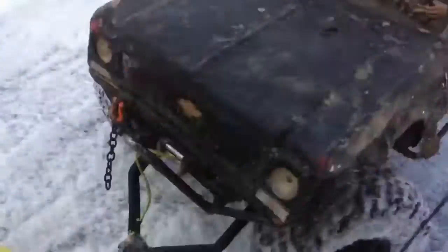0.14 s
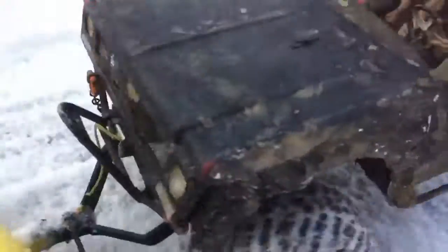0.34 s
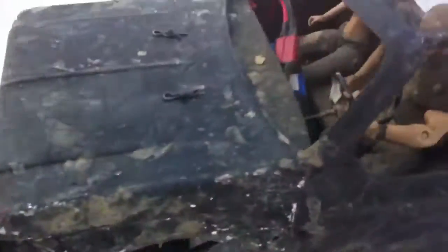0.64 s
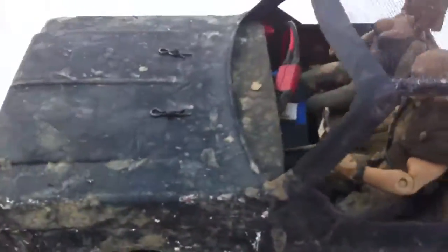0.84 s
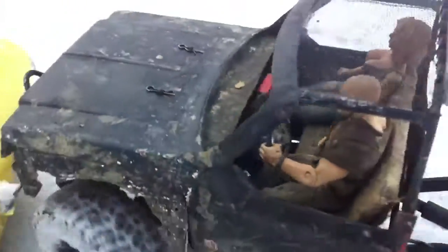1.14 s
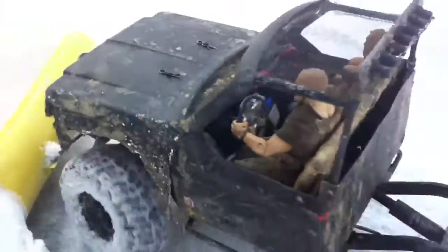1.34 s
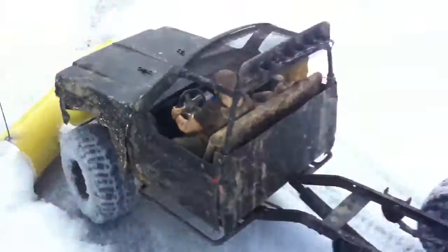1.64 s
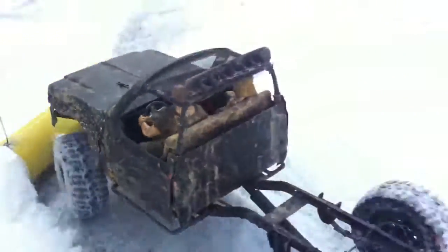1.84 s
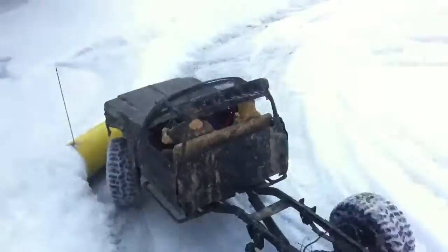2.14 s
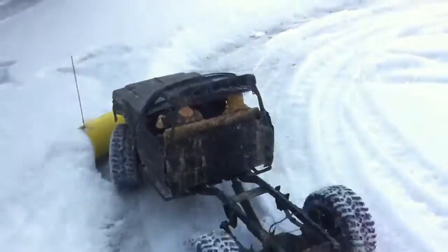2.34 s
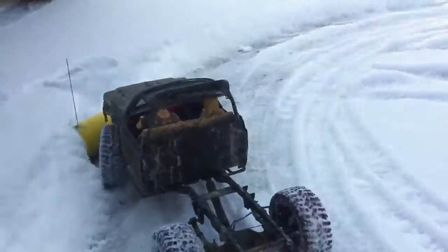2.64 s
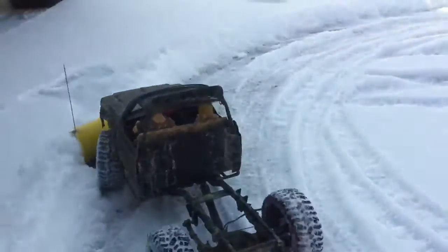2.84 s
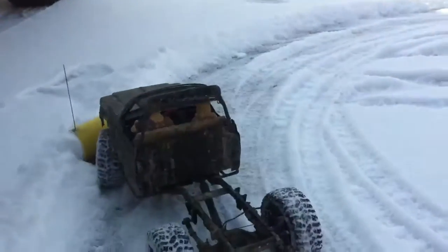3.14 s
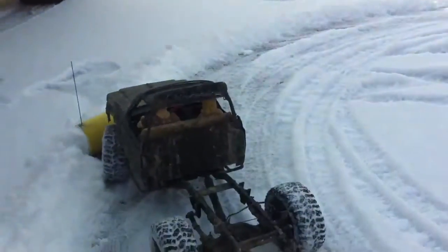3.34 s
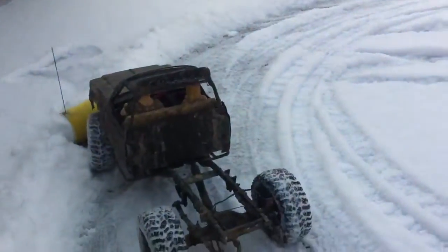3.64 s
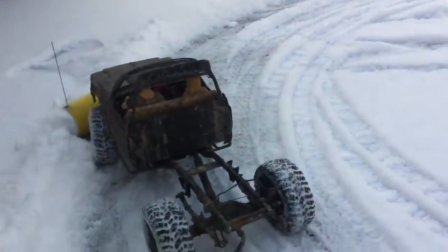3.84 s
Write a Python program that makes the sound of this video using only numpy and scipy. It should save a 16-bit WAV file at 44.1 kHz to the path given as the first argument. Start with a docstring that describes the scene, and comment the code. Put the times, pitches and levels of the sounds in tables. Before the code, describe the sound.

Close gear chatter and motor whir from a toy truck, cutting out once.

```python
"""A toy truck ploughs through snow close by, its loaded gear teeth chattering and shaking the chassis.
It passes side-on, then shows its ringing rear gearbox; slack gears clack and the body thuds over bumps.
As the load eases the motor's pulsing whir takes over. It stalls for a moment, leaving metal parts
ringing over a faint bed of outdoor air, and spins up again."""
import sys
import numpy as np
from scipy import signal
from scipy.fft import rfft, irfft, next_fast_len
from scipy.io import wavfile
from scipy.ndimage import uniform_filter1d, map_coordinates

SR = 44100
rng = np.random.default_rng(int(sys.argv[2]) if len(sys.argv) > 2 else 0)


def dump_mix(stems):
    """Bounce the given channels to the path in sys.argv[1] as a 16-bit WAV at rate SR."""
    frames = np.atleast_2d(stems).T  # one column per channel
    limited = np.clip(frames, -1, 1)  # hard clip at full scale
    pcm = np.round(limited * 32767).astype(np.int16)
    wavfile.write(sys.argv[1], SR, pcm)


N = 176400

# drive train fader, surging as the tyres grip and slip (time [s], level [dB])
DRIVE_LEVEL = [(0.0, -30.5), (0.33, -30.5), (0.36, -27), (0.39, -29), (0.5, -30), (0.53, -26.5),
               (0.57, -32), (0.61, -24.5), (0.62, -28.5), (0.69, -25.5), (0.71, -31), (0.76, -24),
               (0.79, -30), (0.84, -24), (0.88, -32), (0.94, -27), (1.08, -24.5), (1.1, -29), (1.14, -22),
               (1.2, -28.5), (1.25, -23), (1.37, -26.5), (1.4, -22), (1.42, -30.5), (1.44, -26.5),
               (1.48, -22), (1.52, -31.5), (1.56, -23), (1.61, -31), (1.64, -25.5), (1.74, -29.5),
               (1.79, -27.5), (1.84, -32.5), (1.87, -27), (1.91, -31), (1.95, -26), (1.98, -32),
               (2.05, -26), (2.09, -35.5), (2.15, -29.5), (2.2, -34), (2.22, -27.5), (2.31, -31.5),
               (2.35, -28.5), (2.46, -32), (2.47, -29), (2.52, -33), (2.6, -33), (2.62, -28.5), (2.66, -29),
               (2.7, -35.5), (2.77, -32.5), (2.84, -39.5), (2.9, -25), (3.04, -35), (3.17, -32),
               (3.3, -38.5), (3.33, -39.5), (3.36, -45.5), (3.38, -60), (3.41, -69), (3.5, -77.5),
               (3.515, -62), (3.56, -47.5), (3.6, -41), (3.63, -35), (3.83, -30.5), (4, -36.5)]
# motor speed (time [s], speed [turns/s])
MOTOR_SPEED = [(0, 135), (.35, 148), (.6, 147), (1.2, 168), (1.56, 178), (1.75, 168), (2.2, 170),
               (2.6, 150), (2.95, 160), (3.04, 158), (3.1, 103), (3.16, 147), (3.21, 143), (3.29, 123),
               (3.35, 119), (3.39, 40), (3.5, 38), (3.58, 80), (3.68, 111), (3.77, 128), (3.87, 130),
               (4, 124)]
# mix under the drive fader (time [s], chassis [dB], chatter [dB], gear case [dB], open side [dB],
# cab [dB], rear gearbox [dB], whir [dB], whine [dB])
PART_MIX = [(0, -7, -3, -14, -7.5, -34, -1.5, -7.5, -27), (.5, -8.5, -2.5, -10, -24, -30, -20, -11.5, -34),
            (.8, -12, -3, -5, -10, -13, -11, -7.5, -13), (1.08, -13, -4, -44, -2, -10.5, -32, -10, -36),
            (1.25, -16.5, -5, -18.5, -4, -8.5, -14, -14, -23),
            (1.62, -12.5, -8, -13.5, -6.5, -8.5, -17, -7.5, -7),
            (1.85, -10, -5, -9.5, -36, -8.5, -4.5, -5.5, -10),
            (2.65, -13.5, -7.5, -8.5, -41, -29, -3.5, -5, -17),
            (2.95, -18, -12.5, -6.5, -4, -22, -4, -3.5, -18), (3.1, -23, -16, -13, -28, -27, -3, -7, -22),
            (3.17, -33, -14, -15.5, -19, -13, -8, -0.5, -5),
            (3.33, -17.5, -6, -9.5, -35, -5.5, -0.5, 2.5, -12), (3.41, -2, -6, -8, -17, -31, -23, -39, -7),
            (3.5, -4, -3, -14, -22, -26, -18, 3, -18), (3.53, -18, -4.5, -13, -10, -13, -8, -17, -22),
            (3.66, -24, -21, -10, -30, -20, -4.5, -1.5, -27),
            (3.76, -35, -20.5, -31, -22, -16, -22, -3.5, -28),
            (4, -28.5, -18, -22, -19, -27, -13, -1.5, -35)]
# tone colours of the noise layers (frequency [Hz], gain [dB])
CHATTER_EQ = [(410, -60), (700, -11), (818, -7.5), (907, -13), (1130, -3), (1240, -4.5), (1830, -0.5),
              (2220, -4.5), (2990, -0.5), (4240, -5.5), (4580, -9.5), (5710, -6.5), (6850, -11),
              (13100, -18.5), (15500, -36)]
WHIR_EQ = [(120, -84), (200, -70), (283, -31), (327, -46), (544, -28), (992, -17), (1280, -27), (1510, -12),
           (1950, -8.5), (2090, -15), (2750, -1), (3420, 1.5), (4500, -6), (5200, 2), (5900, -1.5),
           (6800, 1.5), (10500, -7.5), (15500, -16)]
CHASSIS_EQ = [(40, -31), (90, -26), (140, -9.5), (205, 1), (300, 0), (400, 4.5), (490, 10), (590, 3.5),
              (720, 0), (1000, 1.5), (2000, -7.5)]
THUD_EQ = [(70, -45), (185, -1), (260, 0), (350, -10), (480, 10), (700, -7), (1200, -2), (2200, -13)]
AIR_EQ = [(25, -10), (100, 4), (220, 6.5), (400, -3), (1200, -11), (3000, -15), (15000, -42)]
CLACK_EQ = [(100, -55), (500, -22), (1800, -15), (2850, -12), (3300, 3), (3900, -14), (15000, -34)]
# resonances of the housings (frequency [Hz], width [Hz], gain [dB])
GEAR_CASE_MODES = [(868, 43, 0.5), (1830, 147, 5.5)]
OPEN_SIDE_MODES = [(2350, 350, -0.89), (2800, 500, 0.93)]
CAB_MODES = [(4040, 170, 4.5), (4330, 67, 4), (9950, 430, -4.5)]
REAR_GEARBOX_MODES = [(2010, 35, -25), (3253, 290, 10.5), (6400, 130, -9), (8100, 360, -2)]
# tones of the meshing gears (pitch [x motor speed], level against the whir [dB], flutter [x pitch])
MESH_TONES = [(2.19, -38, 0.0088), (10, -25, 0.0165)]
# whine of the loaded teeth (pitch [x motor speed], relative level [dB], width [Hz])
WHINE_TONES = [(19.75, 14, 190), (31.3, -17, 250)]
# ringing metal parts (frequency [Hz], relative level [dB], t60 [s])
METAL_MODES = [(623, -6.5, 0.45), (898, -5.5, 0.8), (1390, -4, .26), (1916, -5, 0.23), (2073, 2, 0.16),
               (2428, 5, 0.18), (2724, 0, 0.36), (3830, -9, 0.21), (8629, -15, 0.96)]
# bumps of the chassis (time [s], level [dB])
CHASSIS_BUMPS = [(.826, -31.5), (1.134, -40), (1.63, -29.5), (2.019, -25), (2.039, -36), (2.226, -35)]
# slack gears taking up the load (time [s], level [dB])
GEAR_CLACKS = [(0.754, -22), (.897, -26), (1.434, -26), (1.634, -18), (1.748, -21), (1.846, -24),
               (2.093, -26.5), (2.12, -28), (2.345, -25.5), (2.723, -29.5), (3.512, -60), (3.558, -45)]

LOADED_ABOVE_DB = -16.5  # chatter level from which the motor runs unevenly
LEVELLER_SAMPLES = 2600  # window that irons out slow swings in level


def amp(db):
    """Decibels to gain."""
    return 10 ** (np.asarray(db) / 20)


def unit(x):
    """x at rms 1."""
    return x / np.sqrt(np.mean(x ** 2) + 1e-20)


def curves(rows):
    """One automation curve for each column after the time."""
    times, *columns = np.transpose(rows)
    return [np.interp(np.arange(N) / SR, times, column) for column in columns]


def wobble(rate):
    """A smooth random curve, rate knots a second."""
    knots = rng.standard_normal(4096)[:int(N * rate / SR) + 4]
    return map_coordinates(knots, [np.arange(N) * rate / SR])


def filtered(x, response):
    """x times a complex response of frequency."""
    size = 2 * next_fast_len(N * 3 // 4)
    return irfft(rfft(x, size) * response(np.fft.rfftfreq(size, 1 / SR)), size)[:N]


def coloured(x, eq):
    """x through a minimum-phase EQ of (frequency [Hz], gain [dB]) points."""
    points_hz, db = np.transpose(eq)

    def response(hz):
        gain = amp(np.interp(np.log(hz + 1), np.log(points_hz + 1), db))
        cepstrum = irfft(np.log(gain))
        half = len(cepstrum) // 2
        cepstrum[1:half] *= 2
        cepstrum[half + 1:] = 0
        return np.exp(rfft(cepstrum))
    return filtered(x, response)


def resonated(x, modes):
    """x through a bank of resonances."""
    return filtered(x, lambda f: sum(amp(db) * 1j * f * width / (hz * hz - f * f + 1j * f * width)
                                     for hz, width, db in modes))


def decay(t60):
    """One second of a fall by 60 dB every t60."""
    return np.exp(-np.log(1000) * np.arange(SR) / SR / t60)


def impulses(rows):
    """One impulse for each (time [s], level [dB]) row."""
    x = np.zeros(N)
    for s, db in rows:
        x[round(s * SR)] += amp(db)
    return x


def shaped_noise(envelope, eq):
    """Noise that rides an envelope into an EQ."""
    noise = rng.standard_normal(N)
    return coloured(envelope * noise, eq) / np.std(coloured(noise, eq))


def tooth_force(hits_per_s=380, spread_db=0.5, rub_db=2.5):
    """Loaded teeth strike at uneven times, each a short scratch, over steady rubbing."""
    strikes = rng.random(N) < hits_per_s / SR
    hits = strikes * amp(-spread_db * np.clip(rng.standard_normal(N), -2, 2))
    power = np.abs(signal.fftconvolve(hits ** 2, decay(t60=0.0062) ** 2)[:N])
    force = unit(np.sqrt(power)) + amp(rub_db)
    return force / np.sqrt(np.abs(uniform_filter1d(force ** 2, LEVELLER_SAMPLES)) + 1e-9)


def gear_chatter(force, chatter_db, case_db, side_db, cab_db, rear_db):
    """Tooth blows sound directly and through the gear case, open side, cab and rear gearbox."""
    blows = lambda: force * rng.standard_normal(N)
    direct = amp(chatter_db) * unit(coloured(blows(), CHATTER_EQ))
    housings = [(GEAR_CASE_MODES, case_db), (OPEN_SIDE_MODES, side_db),
                (CAB_MODES, cab_db), (REAR_GEARBOX_MODES, rear_db)]
    ring = sum(amp(db) * unit(resonated(blows(), modes)) for modes, db in housings)
    return direct + coloured(ring, eq=[(300, -5.0), (800, -2.5), (5000, 0), (13000, -7.0)])


def motor_whir(turns, speed, load, depth_db=4.7):
    """A hiss that swells once a turn, less evenly under load, with fluttering gear mesh tones."""
    pulse_db = depth_db * (1 - load ** 2) * np.cos(2 * np.pi * turns)
    scatter_db = (0.5 + 2.0 * load) * wobble(220)
    swell = amp(pulse_db + scatter_db)
    swell /= np.sqrt(uniform_filter1d(swell ** 2, LEVELLER_SAMPLES))
    whir = unit(coloured(swell * rng.standard_normal(N), WHIR_EQ))
    for multiple, db, flutter in MESH_TONES:
        phase = 2 * np.pi * multiple * np.cumsum(speed * (1 + flutter * wobble(250))) / SR
        whir += amp(db + 4.0 * wobble(40)) * np.sqrt(2) * np.sin(phase)
    return whir


def tooth_whine(turns, force):
    """Rough tones of the loaded teeth glide with the motor."""
    tones = np.zeros(N)
    for multiple, db, width in WHINE_TONES:
        roughness = wobble(width) + 1j * wobble(width)
        tones += amp(db) * np.real(roughness * np.exp(2j * np.pi * multiple * turns))
    return unit(tones * np.sqrt(force))


def colour_flicker(x, depth_db=1.7):
    """The tone colour flickers in small random patches of time and frequency."""
    spectrum = signal.stft(x, nperseg=1024)[2]
    patch = np.outer(np.hanning(7), np.hanning(11))
    field = signal.fftconvolve(rng.standard_normal(spectrum.shape), patch, "same")
    gain = unit(amp(depth_db * unit(field)))
    return signal.istft(spectrum * gain, nperseg=1024)[1][:N]


def chassis(drive, force, level_db):
    """The body rumbles as the teeth shake it and thuds over bumps."""
    shake = drive * force ** 0.29 * amp(level_db + 1.5 * wobble(24.58))
    thuds = signal.fftconvolve(impulses(CHASSIS_BUMPS), decay(t60=0.06))[:N]
    return shaped_noise(shake, CHASSIS_EQ) + shaped_noise(thuds, THUD_EQ)


def metal_ring(drive, chatter_db, whine, whine_send_db=-5, return_db=-20.5, stall_s=3.34, jolt_db=-8):
    """Metal parts pick up the drive train's vibration and ring on after the stalling motor's jolt."""
    vibration = drive * (amp(chatter_db) * rng.standard_normal(N) + amp(whine_send_db) * whine)
    jolt = impulses([(stall_s, jolt_db)])
    t = np.arange(SR) / SR
    ring = sum(amp(db) * unit(decay(t60) * np.cos(2 * np.pi * hz * t)) for hz, db, t60 in METAL_MODES)
    return amp(return_db) * signal.fftconvolve(vibration + jolt, ring / np.sqrt(SR))[:N]


def outdoor_air(level_db=-75.5):
    """A faint, dark bed of still air."""
    return amp(level_db) * unit(coloured(rng.standard_normal(N), AIR_EQ))


def gear_slack(dip_db=-5, free_s=0.01):
    """The drive ducks, in dB, while the teeth cross their play just before each clack."""
    t = np.arange(N) / SR
    return dip_db * sum(np.exp(-(2 * (t - s) / free_s + 1) ** 4) for s, _ in GEAR_CLACKS)


def gear_clacks():
    """The teeth land all at once and ring the gearbox briefly."""
    envelope = signal.fftconvolve(impulses(GEAR_CLACKS), decay(t60=0.034))[:N]
    return shaped_noise(envelope, CLACK_EQ)


def low_thump(start_s=2.228, hz=55, gain_db=-50):
    """One soft, dull push that dies within a cycle."""
    cycles = np.maximum(np.arange(N) / SR - start_s, 0) * hz
    return amp(gain_db) * np.sin(2 * np.pi * cycles) * np.exp(-np.pi * cycles)


def scene():
    """The truck in quiet open air, mixed to mono."""
    drive = amp(curves(DRIVE_LEVEL)[0] + gear_slack())
    speed, = curves(MOTOR_SPEED)
    turns = np.cumsum(speed) / SR
    chassis_db, chatter_db, case_db, side_db, cab_db, rear_db, whir_db, whine_db = curves(PART_MIX)
    load = 1 / (1 + amp(LOADED_ABOVE_DB - chatter_db))  # 0 running free, 1 straining
    force = tooth_force()
    whine = amp(whine_db) * tooth_whine(turns, force)
    whir = amp(whir_db) * motor_whir(turns, speed, load)
    chatter = gear_chatter(force, chatter_db, case_db, side_db, cab_db, rear_db)
    train = colour_flicker(drive * (chatter + whir + whine))
    body = chassis(drive, force, chassis_db)
    metal = metal_ring(drive, chatter_db, whine)
    return (train + body + metal + outdoor_air() + gear_clacks() + low_thump())[None]


def record(dry, cutoff_hz=15900):
    """A brick-wall low-pass trims the very top of the mix."""
    return filtered(dry[0], lambda hz: hz < cutoff_hz)[None]


dry = scene()
out = record(dry)
dump_mix(out)
```